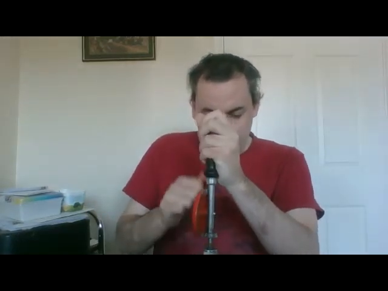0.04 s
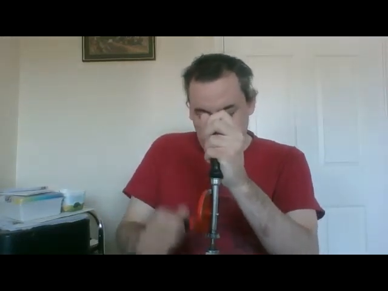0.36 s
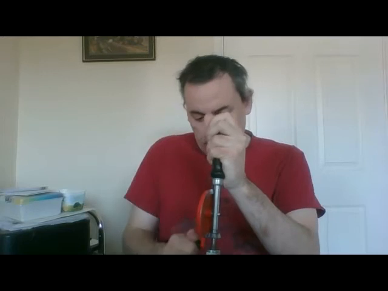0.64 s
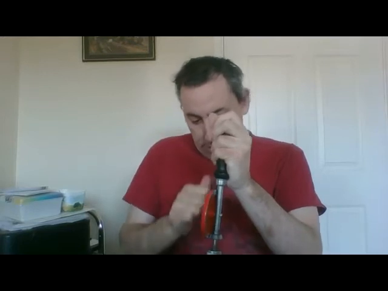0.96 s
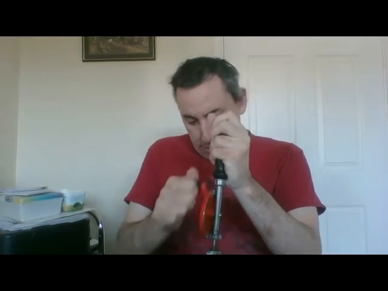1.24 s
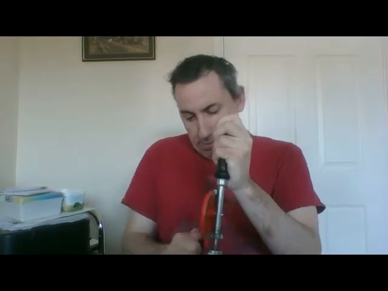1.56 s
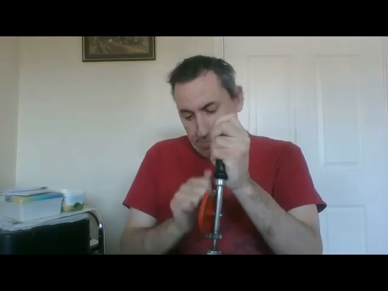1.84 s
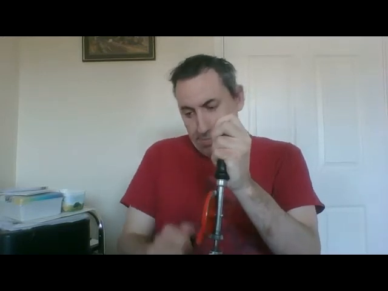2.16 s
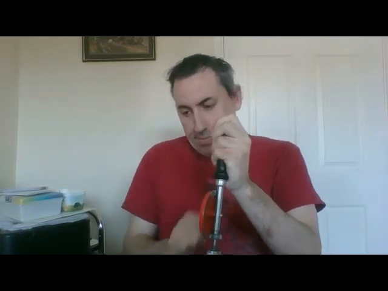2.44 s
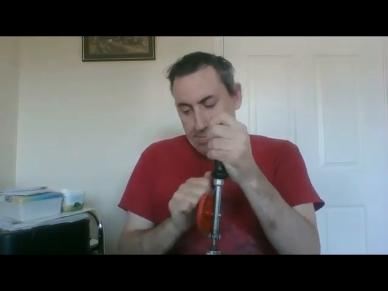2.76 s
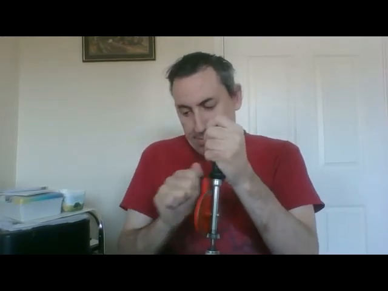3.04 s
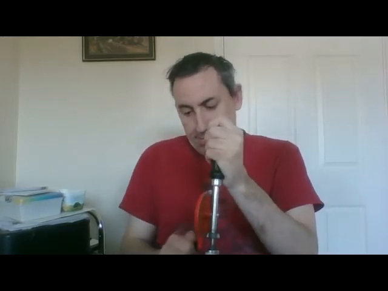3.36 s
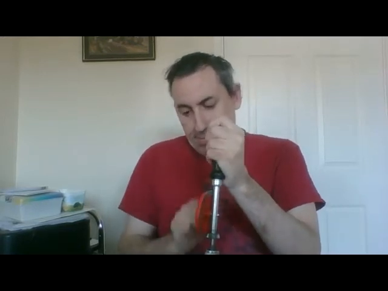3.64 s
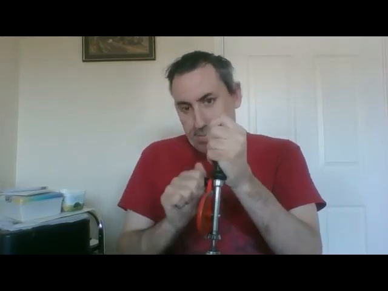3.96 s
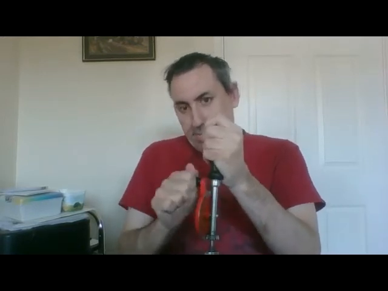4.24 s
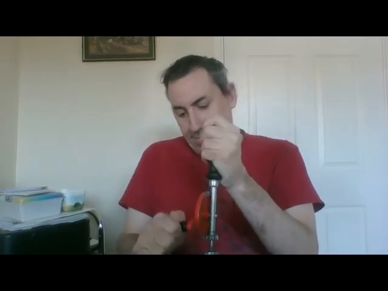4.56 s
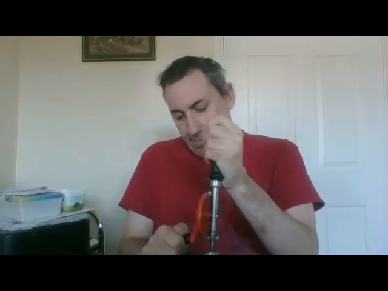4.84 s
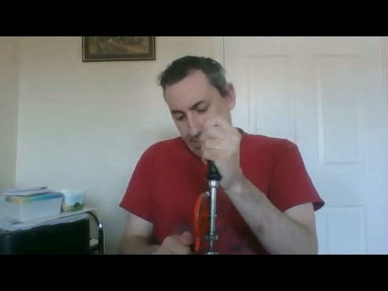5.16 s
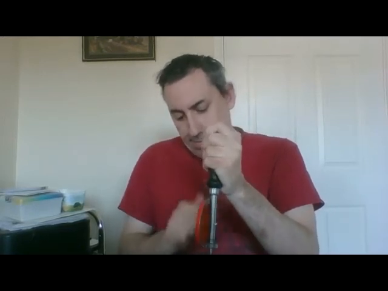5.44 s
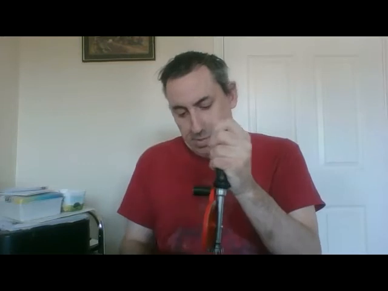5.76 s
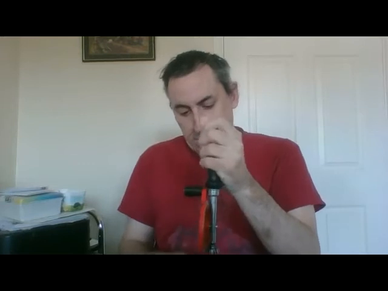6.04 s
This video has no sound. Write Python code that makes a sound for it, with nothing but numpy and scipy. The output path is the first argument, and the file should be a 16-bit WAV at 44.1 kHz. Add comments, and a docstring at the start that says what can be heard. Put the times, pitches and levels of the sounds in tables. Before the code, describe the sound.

Gears click and grind as a hand drill bores a plastic casing, which finally bangs, rattles and knocks once more.

```python
"""A hand-cranked drill bores into a plastic casing in uneven pushes, near the microphone in a small room.
Gear teeth tick, grind and knock in their backlash; the bit scrapes, chips snap and the casing thrums.
A little after five seconds the bit breaks through: the freed casing bangs, rattles and knocks once more.
The direct sound stands well above the room's short tail. Behind it lies a steady hiss, and the
microphone's noise suppressor swallows whatever is quiet."""
import sys
import numpy as np
from scipy import signal
from scipy.fft import rfft, irfft
from scipy.io import wavfile
from scipy.ndimage import uniform_filter1d

SR = 44100
rng = np.random.default_rng(int(sys.argv[2]) if len(sys.argv) > 2 else 0)


def dump(signal):
    """Clip the signal to [-1, 1] and save it as 16-bit WAV at the path in sys.argv[1]."""
    limited = np.clip(np.atleast_2d(signal).T, -1, 1)
    pcm = np.round(limited * 32767).astype(np.int16)
    wavfile.write(sys.argv[1], SR, pcm)


N = 273861
TIME = np.arange(N) / SR

# Pushes of the crank. Each row: peak time, swell and fade in seconds, top speed in teeth per second,
# then the relative levels of gear, scraping bit and thrumming casing in dB.
PUSHES = [(0.018, 0.071, .08, 67, -34.5, -45.5, -49), (0.2857, .095, 0.039, 74, -35.5, -39.5, -40),
          (0.61, .08, 0.13, 42, -58, -71, -68), (0.8397, 0.14, 0.12, 57, -48.5, -45, -48.5),
          (1.0836, 0.078, .075, 72, -38.5, -47.5, -56), (1.2976, 0.069, 0.042, 91, -35.5, -32, -37),
          (1.449, 0.039, 0.02, 65, -45, -47, -59), (1.5282, 0.016, 0.037, 67, -40.5, -51.5, -53),
          (1.734, 0.16, 0.17, 54, -45.5, -72, -48.5), (1.9737, .06, 0.083, 95, -33.5, -50.5, -49.5),
          (2.037, .04, .07, 90, -40, -40.5, -45), (2.385, 0.062, 0.12, 56, -45.5, -66.5, -49),
          (2.9168, .055, 0.086, 66, -36.5, -52.5, -40.5), (3.077, 0.078, 0.12, 180, -38.5, -42.5, -46.5),
          (3.1634, 0.021, 0.035, 90, -34.5, -41.5, -39), (3.239, 0.026, 0.042, 61, -38.5, -46.5, -48),
          (3.3043, 0.08, .08, 52, -51, -42.5, -46), (3.45, 0.18, 0.12, 50, -48.5, -46.5, -43),
          (3.5557, 0.072, .11, 89, -38.5, -44.5, -39.5), (3.68, 0.093, 0.29, 46, -51.5, -56.5, -66),
          (4.2178, 0.045, 0.078, 55, -49.5, -49, -47), (4.335, 0.12, 0.087, 80, -47.5, -43, -47.5),
          (4.4137, 0.056, 0.049, 95, -46.5, -42, -46.5), (4.482, 0.024, 0.0088, 90, -52.5, -43.5, -42.5),
          (5.146, .04, 0.24, 80, -36.5, -39, -48.5)]
# The gear catches hard as it takes up the load. Each row: time in seconds, relative level in dB.
CATCHES = [(0.0044, -33), (0.184, -47.5), (0.2018, -45), (0.2351, -43.5), (0.565, -50), (1.0293, -41.5),
           (1.2462, -38.5), (1.6875, -47), (1.952, -40.5), (2.2638, -48), (2.4344, -42.5), (2.8413, -45),
           (2.8676, -44.5), (3.0691, -31.5), (3.487, -46.5), (3.7373, -58), (4.4004, -53), (5.114, -42)]
# The gear's treble rises and falls. Each row: time in seconds, gain in dB.
GEAR_TREBLE = [(0, -2.5), (.85, 0), (1.3, -1), (1.7, 5), (2.1, -0.5), (2.95, 0), (3.3, -10.5), (3.6, -7.5),
               (4.4, -15), (5.15, -4)]
# Gear backlash: runs of knocks from slack teeth. Each row: start in seconds, level in dB, pitch in Hz,
# loss at the second knock in dB.
BACKLASH_RUNS = [(0.385, -34, 758, 0.7), (0.565, -38, 1023, 20.5), (0.877, -36.5, 857, 26),
                 (1.011, -30, 961, 1.5), (1.511, -33, 853, 8.5), (1.551, -29, 1010, 4),
                 (1.564, -30.5, 985, 32), (2.041, -30, 1018, 16), (2.268, -39, 1026, 30),
                 (2.497, -39.5, 754, 21.5), (2.561, -38.5, 760, 22.5), (3.691, -37, 762, 1.5),
                 (4.458, -35.5, 805, 18), (4.484, -32, 748, 32), (4.556, -37.5, 763, 29),
                 (5.008, -38.5, 750, 1)]
# Chips of plastic snap off. Each row: start in seconds, relative level in dB, pitch in Hz.
CHIP_SNAPS = [(0.1346, -53.5, 1850), (1.198, -58, 1710), (1.4485, -32.5, 2240), (1.6881, -39.5, 2540),
              (2.0926, -24, 2420), (2.6426, -25, 2486), (2.738, -40.5, 1870), (3.9639, -34, 1866),
              (4.9394, -35.5, 1780), (6.0373, -34, 6680)]
# The casing rocks under the bit. Each row: start in seconds, relative level in dB.
CASING_THUMPS = [(0.348, -63.5), (0.658, -42.5), (0.86, -35), (1.125, -35.5), (1.16, -34.5), (1.756, -26),
                 (1.808, -33), (2.311, -40), (2.373, -27), (2.44, -37.5), (4.009, -39.5), (4.975, -41.5),
                 (5.221, -23.5), (6.1, -42.5)]
# The freed casing bangs. Each row: start in seconds, relative levels of bang and high crack in dB.
CASING_BANGS = [(5.264, 2.5, 0.5), (5.277, -14.5, -13), (5.297, -6, -28), (5.309, -28.5, -35.5),
                (5.373, -3.5, -19), (5.409, -19.5, -39), (5.578, -8, -44), (5.65, -18, -42)]
# The casing's last knock. Its row: start in seconds, relative level in dB.
LAST_KNOCK = [(6.093, -5.5)]

# Resonances of the gear, the bit and the casing as it thrums, bangs and last knocks.
# Each row: frequency in Hz, width in Hz, relative level in dB.
GEAR_MODES = [(1050, 150, 0.5), (1521, 230, -2), (1848, 82, 7), (2317, 86, 3.5), (2680, 370, -9),
              (3224, 168, -1.5), (3696, 120, -2.5), (4530, 300, -11), (5240, 192, -9.5), (7655, 440, -7.5),
              (8550, 320, -4.5), (10240, 390, -13.5), (12090, 32, -7.5), (13300, 1700, -22)]
BIT_MODES = [(750, 264, -3), (1116, 120, -3.5), (1375, 88, -6)]
THRUM_MODES = [(167.2, 52.6, 0), (210.9, 47.5, 0), (349, 80, -11)]
BANG_MODES = [(967.7, 21, 8.5), (1420, 30, -2), (1523, 21, -0.5), (1610, 20, 8.5), (1722, 15, 7),
              (1872, 77, 3), (2218, 35, 3.5), (2755, 110, -5.5), (4210, 100, -13.5), (5320, 140, -31.5)]
LAST_KNOCK_MODES = [(672.6, 100, -12), (850, 160, -8), (1425, 170, -6), (1605, 14, 4.5), (1784, 60, -11.5),
                    (2228, 39, 6.5), (3990, 200, -23.5), (6450, 470, -28)]
# Broad spectra of the drill's rasp, the casing's clatter and the background hiss.
# Each row: frequency in Hz, relative level in dB.
RASP_COLOUR = [(400, -0.5), (1000, 2), (2200, 2), (3400, -7), (4700, -7.5), (6600, -14), (8500, -8),
               (11000, -23), (15500, -34)]
CLATTER_COLOUR = [(50, -38), (170, -14), (500, -8.5), (800, -3.5), (1700, 9.5), (3200, -10), (4500, -6.5),
                  (9000, -20), (15500, -25.5)]
HISS_COLOUR = [(40, -42.5), (180, 6.5), (400, -6), (1000, 1), (2000, -6.5), (3500, -21), (8000, -23),
               (15000, -29)]
# The small room's tail. Each row: frequency in Hz, time to fall by 60 dB in seconds.
ROOM_T60 = [(100, 0.44), (1000, 0.31), (4000, 0.24), (14000, 0.12)]


def drill():
    """The crank drives the gear; the bit scrapes and shakes the casing, harder at each tooth."""
    effort = crank_efforts()
    strengths = from_db([row[-3:] for row in PUSHES]).T
    drive, scrape, thrum = np.sqrt(strengths ** 2 @ effort ** 2)   # overlapping pushes add in power
    leading_push = np.argmax(strengths[0][:, None] * effort, axis=0)
    beats = tooth_beats(leading_push)
    mechanism = gear(beats, drive) + bit_scrape(beats, scrape)
    return cut(mechanism, 210, "high") + thrum * casing_thrum(beats)


def crank_efforts(drop_db=15, roundness=1.27):
    """One gain curve per push, drop_db down at one swell before its peak and one fade after."""
    from_peak = np.array([np.maximum((s - TIME) / swell, (TIME - s) / fade)
                          for s, swell, fade, *_ in PUSHES])
    return from_db(-np.minimum(drop_db * from_peak ** roundness, 200))


def tooth_beats(leading_push, slowing=.035, jitter_s=.00061, spread_db=2):
    """Teeth meet fastest at the peak of whichever push is leading, and slow down away from it."""
    rows, tooth = [], np.arange(-20, 21)
    for push, (s, _, _, speed, *_) in enumerate(PUSHES):
        late, strength = rng.standard_normal((2, len(tooth)))
        times = s + tooth * (1 + slowing * np.abs(tooth)) / speed + jitter_s * late
        rows += [(t, db) for t, db in zip(times, spread_db * strength)
                 if 0 < t < TIME[-1] and leading_push[int(t * SR)] == push]
    return clicks(rows)


def gear(beats, drive):
    """Each tooth lands, then slides for a moment; under load the gear also grinds between teeth."""
    teeth = np.maximum(beats * drive, clicks(CATCHES))
    ticks = from_db(20.5) * teeth + from_db(5) * crunch(teeth, decay_s=.0028)
    load = drive / (drive + from_db(-35))   # grinding sets in around this drive level
    force = ticks + from_db(-3) * load * drive * grains(per_s=990, spread_db=2)
    sound = gear_ring(force) + from_db(-14) * through(force, colour(RASP_COLOUR))
    treble = signal.sosfiltfilt(signal.butter(2, 6000, "high", fs=SR, output="sos"), sound)
    treble_gain = from_db(np.interp(TIME, *np.transpose(GEAR_TREBLE)))
    return cut(sound + (treble_gain - 1) * treble, 12000, "low")


def gear_ring(force):
    """Each tooth meets at another spot, so the modes answer with changing strengths."""
    ring = np.zeros(N)
    for k, (hz, width, db) in enumerate(GEAR_MODES):
        mode = through(force * wander(per_s=60, spread_db=10), body([(hz, width, 0)]))
        ring += (-1) ** k * from_db(db) * np.sqrt(width / 1000) * mode
    return ring


def bit_scrape(beats, strength):
    """The bit slips over the plastic in fine grains, with a burst at each tooth."""
    slips = from_db(-1.5) * grains(per_s=1000, spread_db=4) + from_db(4.5) * crunch(beats, decay_s=.003)
    return through(strength * slips, body(BIT_MODES))


def casing_thrum(beats):
    """The bit shakes the casing's low resonances."""
    shake = from_db(-5) * grains(per_s=690, spread_db=-1.5) + from_db(8.5) * crunch(beats, decay_s=.0049)
    thrum = cut(through(shake, body(THRUM_MODES)), 580, "low")
    return cut(thrum, 100, "high", order=4)


def gear_backlash(knock_gap_s=.0245):
    """Slack teeth knock in short, fading runs, about 25 ms apart, as the crank coasts."""
    hits = [(s + k * knock_gap_s, db - k * k * loss, hz)
            for s, db, hz, loss in BACKLASH_RUNS for k in range(3)]
    rasp = through(crunch(clicks(hits), decay_s=.0013), colour(RASP_COLOUR))
    return pings(hits, rise_s=.00073, decay_s=.0044) + from_db(-17.5) * rasp


def chip_snaps():
    """Each chip breaks off with a short ping and a crunch."""
    rasp = through(crunch(clicks(CHIP_SNAPS), decay_s=.0027), colour(RASP_COLOUR))
    return from_db(-3.5) * pings(CHIP_SNAPS, rise_s=.0004, decay_s=.0021) + from_db(-8) * rasp


def casing_thumps(hz=187):
    """The casing rocks under the bit with soft, low thumps."""
    return from_db(-1.5) * pings([(s, db, hz) for s, db in CASING_THUMPS], rise_s=.052, decay_s=.005)


def breakthrough():
    """The freed casing bangs and rattles on the bit: it rings, clatters and cracks."""
    strikes = clicks(CASING_BANGS)
    slips = crunch(strikes, decay_s=.0045)
    rattle = casing_rattle()
    ring = through(from_db(15) * strikes + from_db(-5.5) * slips + rattle, body(BANG_MODES))
    clatter = through(slips + rattle, colour(CLATTER_COLOUR))
    cracks = crunch(clicks([(s, crack_db) for s, _, crack_db in CASING_BANGS]), decay_s=.0041)
    return cut(ring + clatter, 100, "high", order=4) + from_db(-7.5) * cut(cracks, 3300, "high")


def casing_rattle(start_s=5.243, hold_s=.15, end_s=5.71, fade_db_per_s=129):
    """Small contacts of casing and bit: steady at first, then dying until it comes to rest."""
    dying_s = np.maximum(TIME - start_s - hold_s, 0)
    envelope = from_db(-24.5 - fade_db_per_s * dying_s) * (TIME > start_s) * (TIME < end_s)
    return envelope * grains(per_s=950, spread_db=4)


def last_knock():
    """One more strike rings the casing, with a little clatter."""
    strike = clicks(LAST_KNOCK)
    ring = through(strike, body(LAST_KNOCK_MODES, damping=.46))
    clatter = through(crunch(strike, decay_s=.01), colour(CLATTER_COLOUR))
    return cut(from_db(21.5) * ring + from_db(-11.5) * clatter, 534, "high")


def room(x, wet_db, delay_s):
    """Dense reflections reach the microphone after the direct sound and die away, the treble first."""
    t, tail = TIME[:SR], np.zeros(SR)
    for low_hz in 60 * 2 ** np.arange(9.):
        octave = cut(rng.standard_normal(SR), [low_hz, min(2 * low_hz, .45 * SR)], "band")
        tail += octave * from_db(-60 * t / at_hz(ROOM_T60, low_hz * np.sqrt(2)))
    return x + from_db(wet_db) * through(x, unit(tail * (t > delay_s)))


def hiss():
    """A faint, steady noise floor."""
    return from_db(-52) * through(rng.standard_normal(N), colour(HISS_COLOUR))


def noise_suppressor(x, margin_db, depth_db, size=512):
    """The microphone turns down every band that does not stand clear of its own quiet level."""
    frames = dict(nperseg=size, noverlap=size - size // 4)
    spectrum = signal.stft(x, **frames)[2]
    power = uniform_filter1d(np.abs(spectrum) ** 2, size=5, axis=-2)   # smooth across bands
    power = uniform_filter1d(power, size=3, axis=-1)   # and along time
    floor = uniform_filter1d(np.percentile(power, 8, axis=-1, keepdims=True), size=5, axis=-2)
    clearance = (power / (floor * from_db(margin_db) ** 2 + 1e-20)) ** 4
    gain = np.maximum(clearance / (1 + clearance), from_db(depth_db))
    return signal.istft(spectrum * gain, **frames)[1][..., :N]


def clicks(rows):
    """One impulse for each row of seconds and dB."""
    out = np.zeros(N)
    for s, db, *_ in rows:
        out[int(np.clip(s * SR, 0, N - 1))] += from_db(db)
    return out


def pings(rows, rise_s, decay_s):
    """Each touch swells quickly and rings out at its own pitch."""
    out, t = np.zeros(N), TIME[:SR // 8]
    shape = (1 - np.exp(-t / rise_s)) ** 2 * np.exp(-t / decay_s)
    shape /= shape.max()
    for s, db, hz in rows:
        at = max(0, int(s * SR))
        out[at:at + len(t)] += (from_db(db) * shape * np.sin(2 * np.pi * hz * t))[:N - at]
    return out


def crunch(impulses, decay_s):
    """Each contact is a short burst of tiny random slips."""
    envelope = signal.lfilter([1], [1, -np.exp(-1 / (decay_s * SR))], impulses + 1e-18)
    return envelope * rng.choice([-1, 1], N)


def grains(per_s, spread_db):
    """Random slips of uneven size; rms 1."""
    sizes = from_db(spread_db * np.minimum(rng.exponential(1, N), 3))
    slipping = rng.random(N) < per_s / SR
    return np.sqrt(N) * unit(sizes * slipping * rng.choice([-1, 1], N))


def wander(per_s, spread_db):
    """A gain that moves at random within spread_db either way, per_s times a second."""
    return from_db(spread_db * np.interp(TIME * per_s, np.arange(2048), rng.uniform(-1, 1, 2048)))


def body(modes, damping=1):
    """Response of parallel resonances with alternating signs; damping scales their widths."""
    t = TIME[:SR // 2]
    return unit(sum((-1) ** k * from_db(db) * width * np.exp(-np.pi * width * damping * t)
                    * np.cos(2 * np.pi * hz * t) for k, (hz, width, db) in enumerate(modes)))


def colour(points, size=4096):
    """Causal (minimum-phase) response with a broad spectrum."""
    gains = from_db(at_hz(points, np.fft.rfftfreq(size, 1 / SR)))
    cepstrum = irfft(np.log(gains))
    cepstrum[size // 2:] = 0
    cepstrum[1:] *= 2
    return unit(irfft(np.exp(rfft(cepstrum))))


def through(x, response):
    """Pass a sound through a response."""
    return signal.fftconvolve(x, response)[:N]


def cut(x, hz, kind, order=2):
    """Butterworth filter; kind names the part that passes."""
    return signal.sosfilt(signal.butter(order, hz, kind, fs=SR, output="sos"), x)


def unit(response):
    """Scale a response to unit energy."""
    return response / np.sqrt(np.sum(response ** 2))


def at_hz(points, hz):
    """Read a table on a log-frequency axis."""
    f, value = np.transpose(points)
    return np.interp(np.log(np.maximum(hz, 1)), np.log(f), value)


def from_db(db):
    """Decibels to gain."""
    return 10 ** (np.asarray(db) / 20)


def scene():
    """Drill and casing near one microphone in the small room, over a steady hiss."""
    background = hiss()
    drilling = room(drill(), wet_db=-9, delay_s=.005)
    small_hits = cut(gear_backlash() + chip_snaps(), 380, "high") + casing_thumps()
    knocking = room(small_hits, wet_db=-11, delay_s=.002)
    banging = room(breakthrough() + last_knock(), wet_db=-8.5, delay_s=.00096)
    return (drilling + knocking + banging + background)[None]


def record(dry):
    """The microphone suppresses noise, rounds the peaks and passes 35 Hz to 15.9 kHz."""
    suppressed = noise_suppressor(dry, margin_db=11.5, depth_db=-21)
    rounded = .9 * np.tanh(suppressed / .9)
    steep_lowpass = signal.ellip(10, .1, 80, 15900, fs=SR, output="sos")
    return signal.sosfilt(steep_lowpass, cut(rounded, 35, "high"))


dry = scene()
out = record(dry)
dump(out)
```